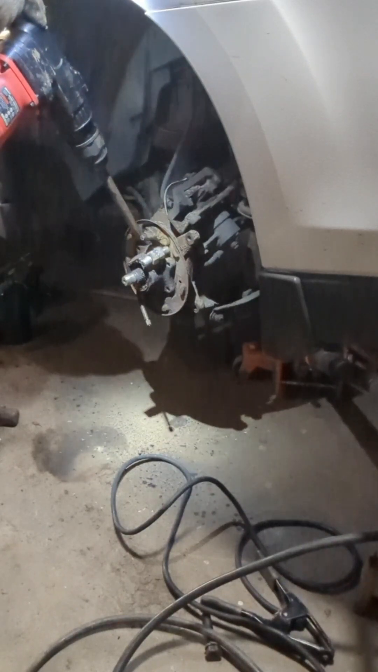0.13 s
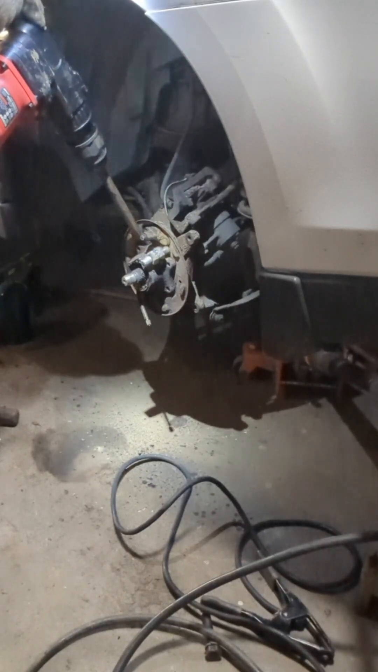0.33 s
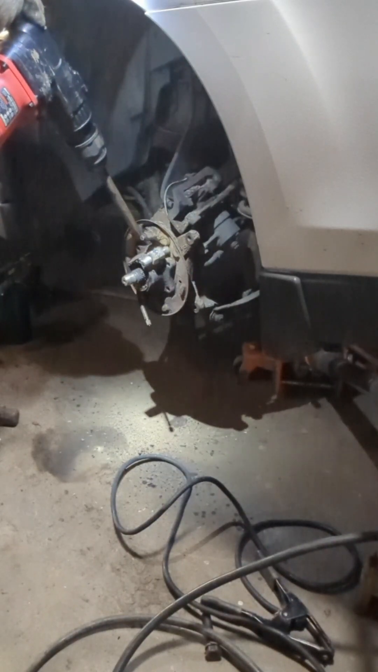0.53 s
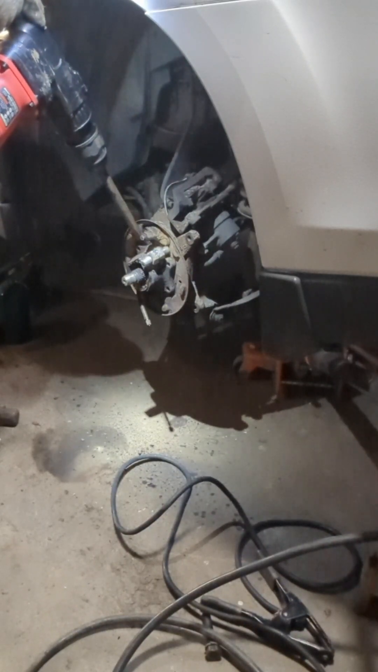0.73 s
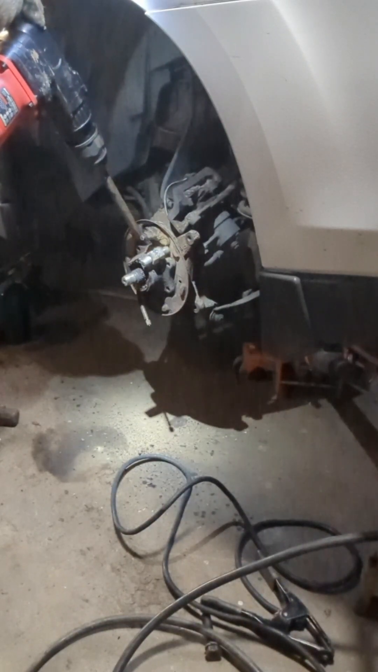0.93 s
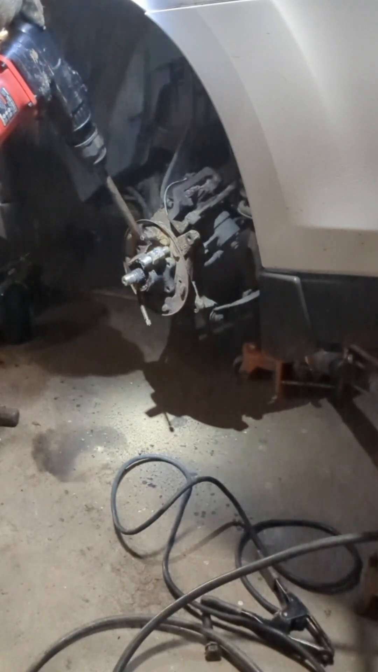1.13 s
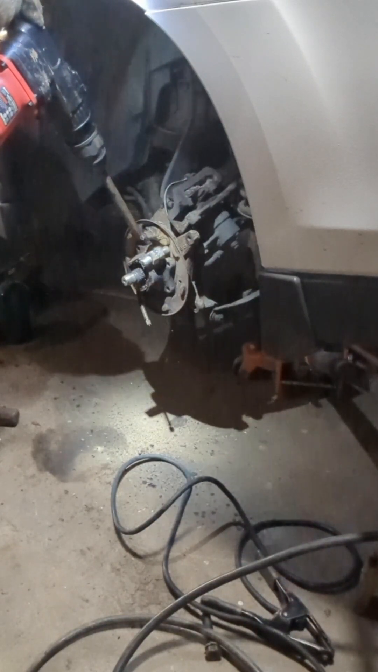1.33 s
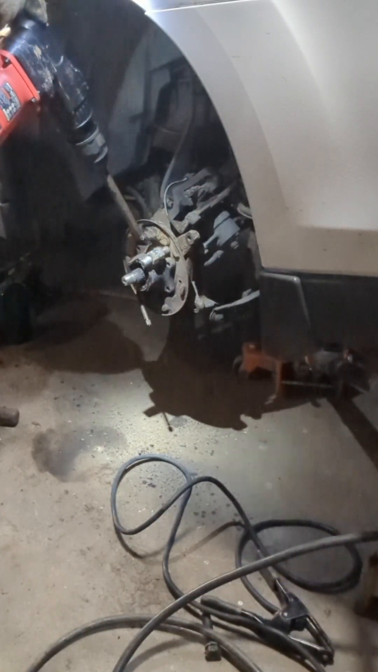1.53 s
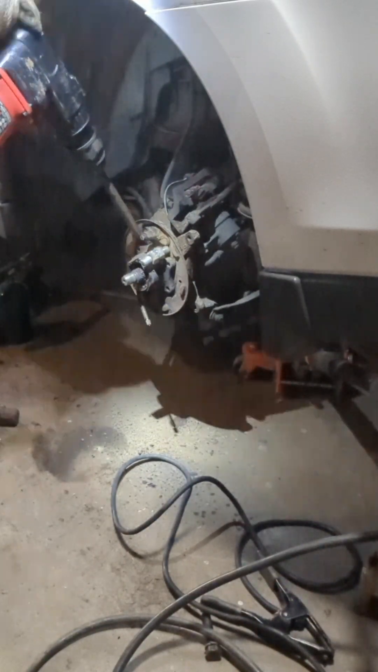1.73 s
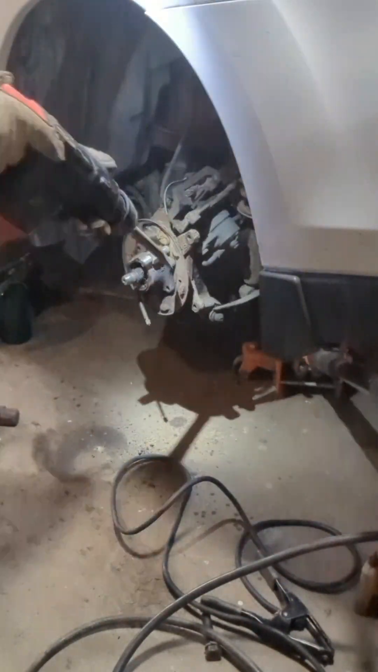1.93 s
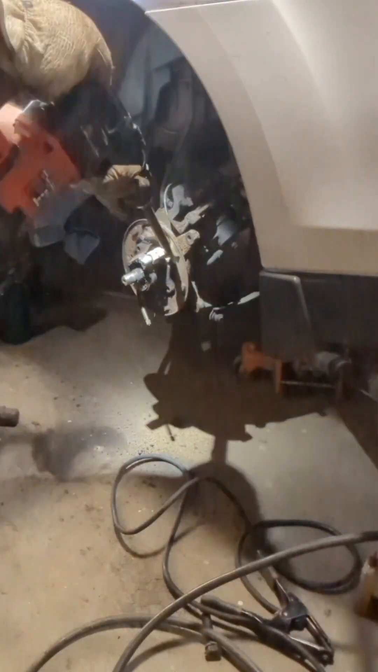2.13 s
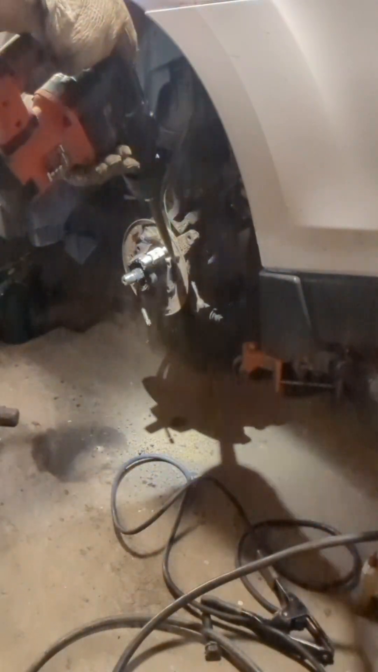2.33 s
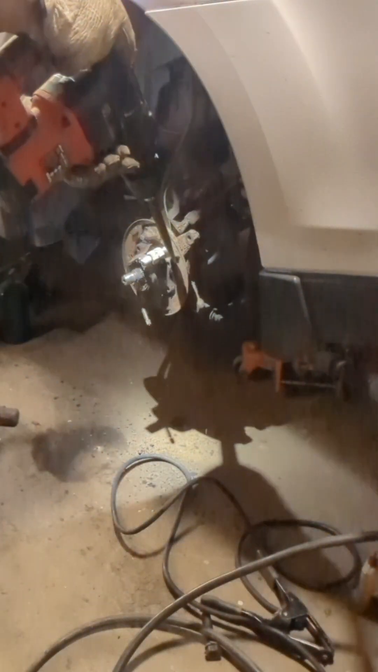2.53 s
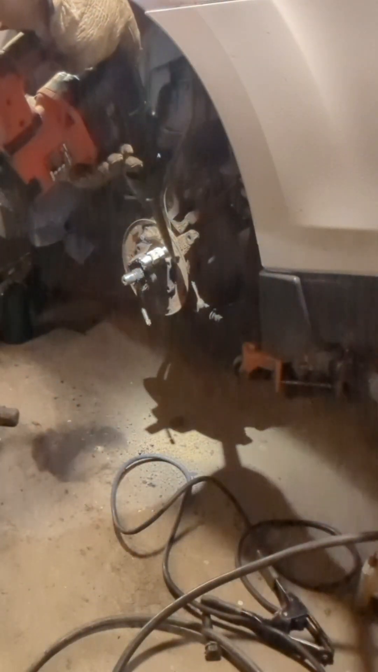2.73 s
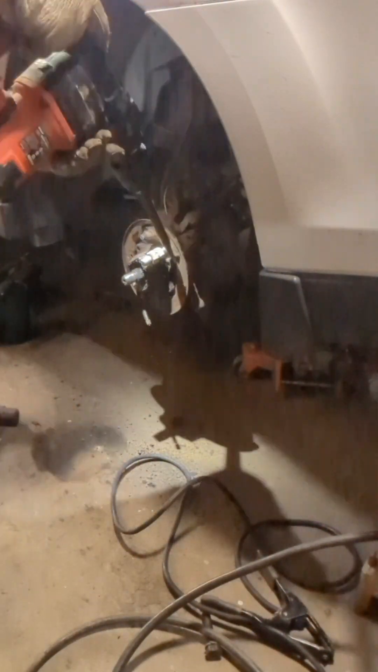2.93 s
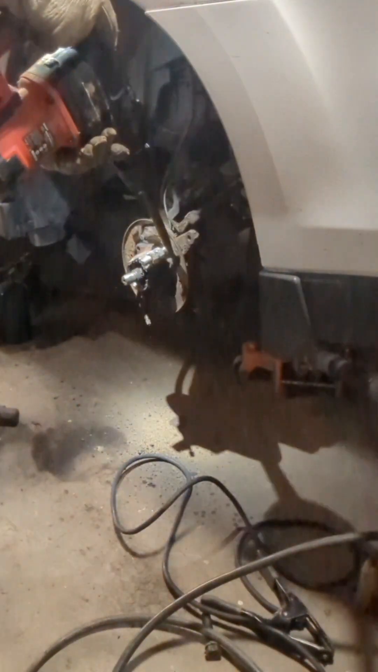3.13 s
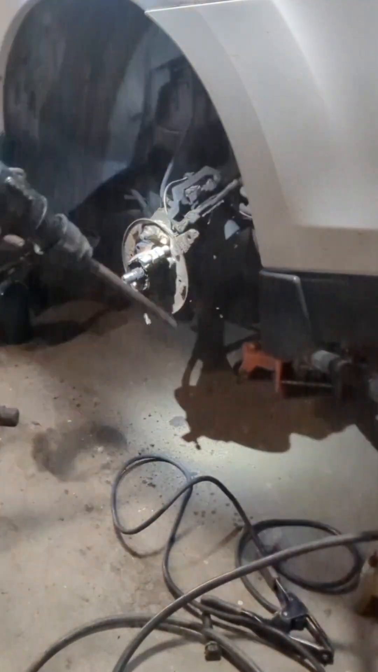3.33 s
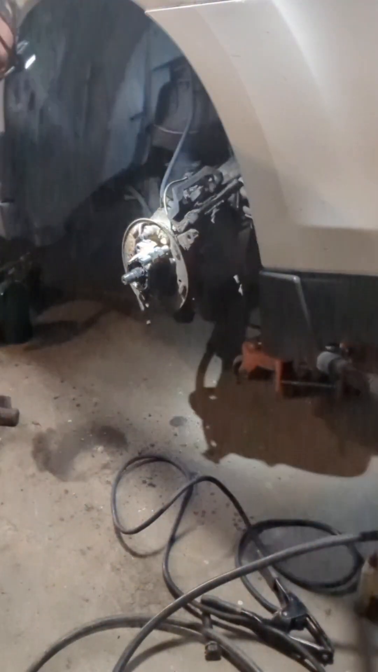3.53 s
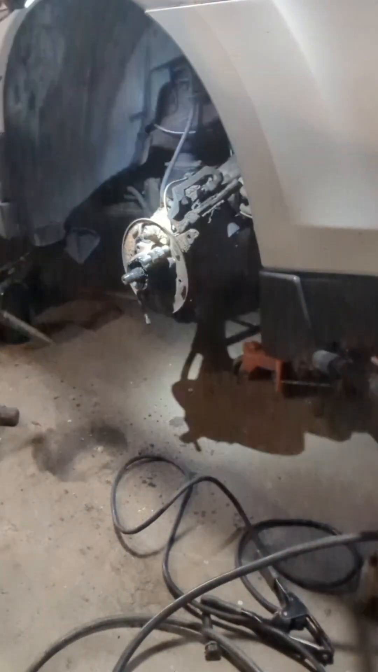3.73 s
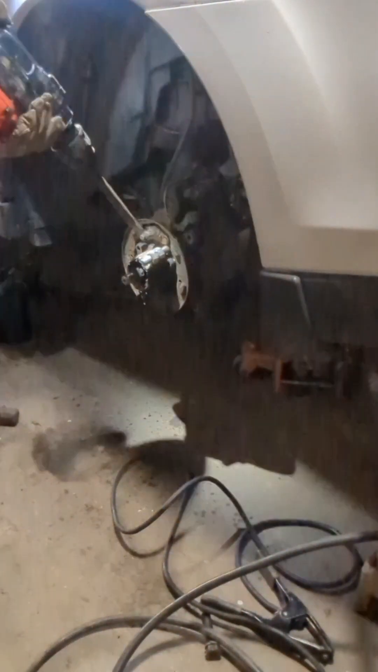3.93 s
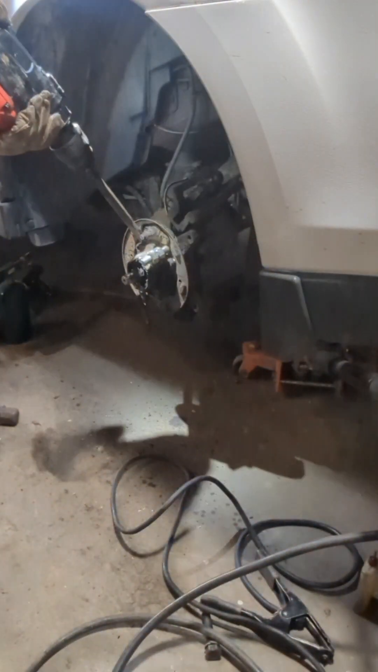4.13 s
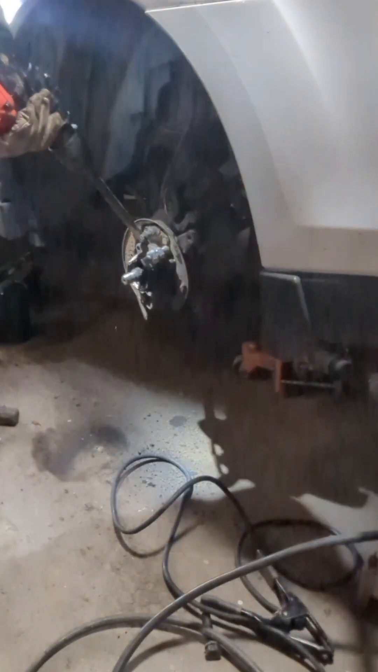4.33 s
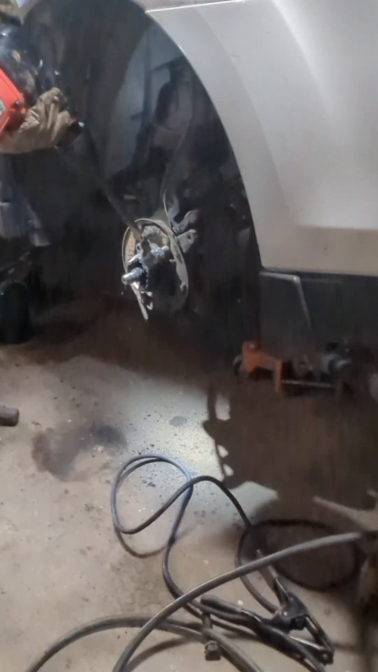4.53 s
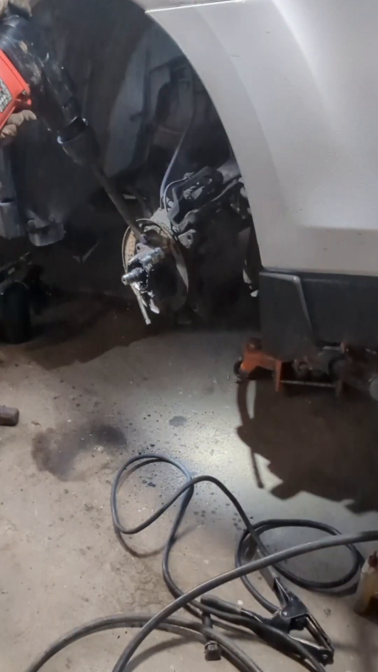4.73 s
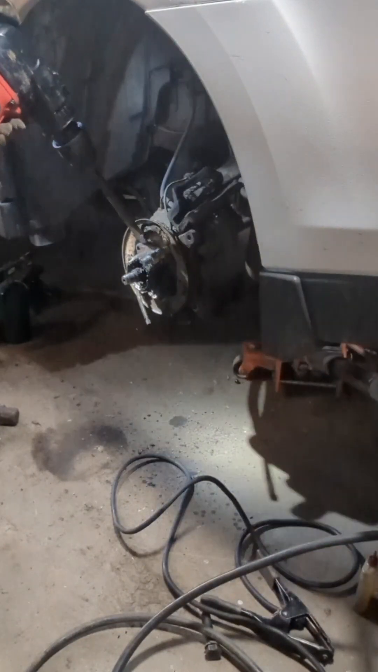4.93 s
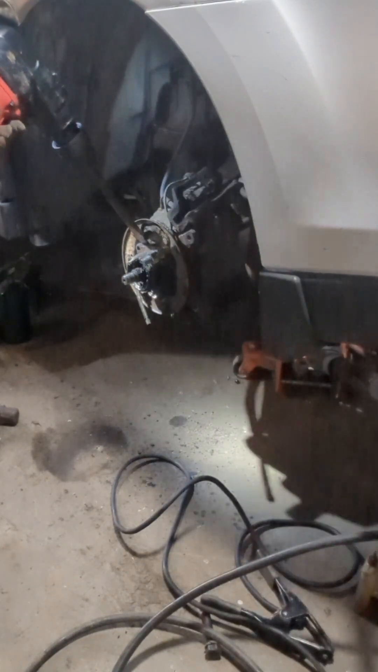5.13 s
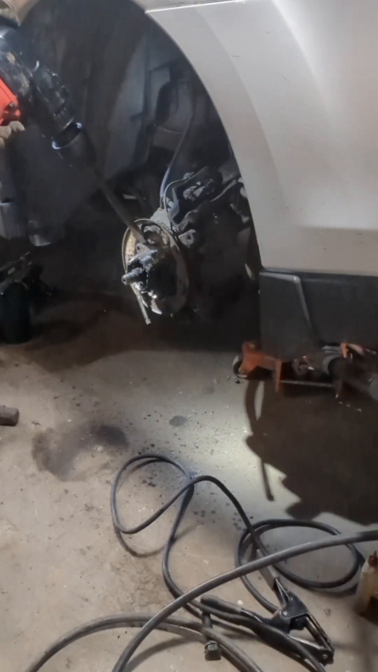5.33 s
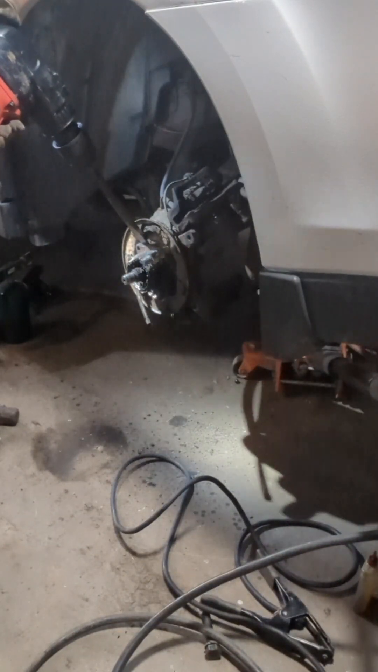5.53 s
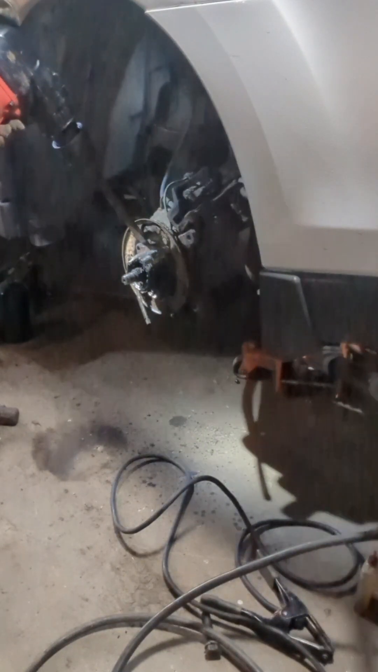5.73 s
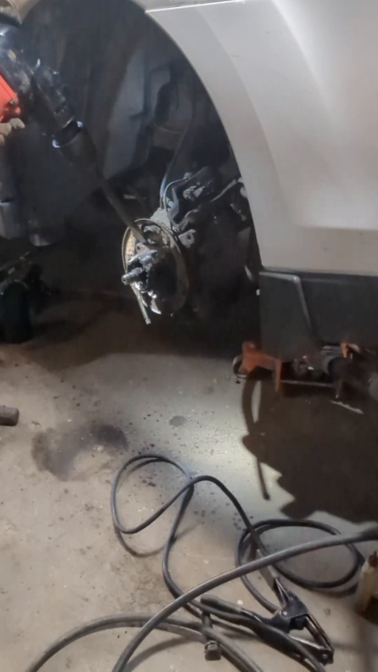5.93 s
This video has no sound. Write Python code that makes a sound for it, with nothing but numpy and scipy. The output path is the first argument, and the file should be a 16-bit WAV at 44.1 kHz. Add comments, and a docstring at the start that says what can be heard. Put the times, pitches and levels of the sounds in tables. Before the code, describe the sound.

From the very start an electric rotary hammer pounds a chisel into a car wheel hub, close by in a garage. It is a loud, steady, buzzing rattle of about fifty blows a second, with ringing steel, clattering loose parts and a few low thumps on the right of the microphone. At 1.4 seconds the hammering ends with small knocks, and the motor whines freely, much quieter, until 1.8. Faint scrapes follow. At 2.1 seconds the motor restarts with metallic clicks and runs without load, a high whine over airy hiss, until 3.3. In the pause come soft glove scrapes and tiny squeaks, then a sharp click and knock near 3.9 as the motor starts again. This last run settles into a steady whir with light ticks of the loose chisel, shifts slightly in tone around 4.8, and continues to the end at about 6 seconds.

```python
"""A rotary hammer drives a chisel into a seized wheel hub in a garage, about 51 blows a second.
Hub, brake shield and chisel ring, the suspension clatters, and hard blows jolt the right microphone.
Then the pressure comes off: fan, commutator and gears whine unloaded over the hiss of the brushes.
The motor stops and is started twice more, with scrapes, clicks and knocks as the tool is shifted."""
import sys
import numpy as np
from scipy import signal
from scipy.fft import rfft, irfft, next_fast_len
from scipy.io import wavfile

SR = 44100
rng = np.random.default_rng(int(sys.argv[2]) if len(sys.argv) > 2 else 0)


def store_pcm(level_fs):
    """Save levels as 16-bit WAV."""
    pcm = np.round(np.clip(level_fs, -1, 1) * 32767).astype(np.int16)
    wavfile.write(sys.argv[1], SR, np.atleast_2d(pcm).T)


N = 263698
TIME = np.arange(N) / SR
FIRST_BLOW_S, RELEASE_S, BLOW_HZ = .015, 1.385, 50.817


def undb(db):
    """Decibels to gain."""
    return 10 ** (np.asarray(db) / 20)


def unit(x):
    """Scale each channel to rms 1."""
    return x / np.sqrt(np.mean(x ** 2, axis=-1, keepdims=True) + 1e-20)


def noise():
    """Wide stereo white noise."""
    return rng.standard_normal((2, N))


def gate(start_s, end_s, fade_s):
    """Open between start and end, with soft edges."""
    return np.clip((TIME - start_s) / fade_s + .5, 0, 1) * np.clip((end_s - TIME) / fade_s + .5, 0, 1)


def wander(rate_hz):
    """Smooth random modulation of spread near 1, one for each channel."""
    knots = rng.standard_normal((2, 8192))
    return np.array([np.interp(TIME * rate_hz, np.arange(8192), row) for row in knots])


def filtered(x, response):
    """Apply a gain given as a function of frequency."""
    size = next_fast_len(N + SR // 4)
    hz = np.arange(size // 2 + 1) * SR / size + 1e-3
    return irfft(rfft(x, size) * response(hz), size)[..., :N]


def colour(x, eq):
    """Shape by an EQ curve of (freq_hz, gain_db) points; rms 1."""
    hz, db = np.transpose(eq)
    return unit(filtered(x, lambda f: undb(np.interp(np.log(f), np.log(hz), db))))


def ring(x, hz, width_hz):
    """One damped resonance; rms 1."""
    return unit(signal.lfilter(*signal.iirpeak(hz, hz / width_hz, fs=SR), x))


def tail(start_s, t60_s):
    """Full level until the start, then a decay."""
    return undb(-60 * np.clip((TIME - start_s) / t60_s, 0, 2))


def blows(delay_s, jitter_s, scatter_db):
    """One hit per cycle of the striker, each a little early or late and of its own strength."""
    times = np.arange(FIRST_BLOW_S, RELEASE_S, 1 / BLOW_HZ)
    chance = rng.standard_normal((len(times), 2))
    at = (times + delay_s + jitter_s * chance[:, 0]) * SR
    taps = at.astype(int)[:, None] + np.arange(-7, 9)  # hits land between samples
    train = np.zeros(N)
    train[taps] = np.sinc(taps - at[:, None]) * undb(scatter_db * chance[:, 1:])
    return train


# Dense, bright EQ of the suspension: freq_hz, gain_db
SUSPENSION_EQ = [(30, -7), (60, -15), (160, -11), (280, -9), (600, -1.5), (1100, 1.5), (2000, 2.5),
                 (2600, 2.5), (3000, -1.5), (4200, 0), (8000, -2), (9800, 4), (10900, -7.5), (13800, -3),
                 (16000, -13.5)]

def suspension_clatter(hits, t60_s=.47):
    """The same dense ringing answers every blow, so it buzzes at the blow rate."""
    count = SR // 4
    ringing = noise()[:, :count] * undb(-60 * TIME[:count] / t60_s)
    return colour(signal.fftconvolve(hits[None], ringing, axes=1)[:, :N], SUSPENSION_EQ)


def loose_rattle(decay_s=.22):
    """Loose parts rattle on from each blow to the next."""
    since_blow = (TIME - FIRST_BLOW_S) % (1 / BLOW_HZ)
    rattle = colour(noise(), SUSPENSION_EQ)
    return rattle * unit(np.exp(-since_blow / decay_s) * undb(2 * wander(500) + 2.1 * wander(25.1)))


# Ringing modes of hub and brake shield: pitch_hz, level_db
HUB_MODES = [(560, -54), (610, -54), (764, -56), (915, -56), (1017, -47), (1066, -43), (1119, -49),
             (1220, -46), (1270, -56), (1422, -52), (1524, -51), (1576, -56), (1728, -55), (1931, -52),
             (2083, -51), (2134, -56), (2388, -55), (2590, -53), (2690, -54)]

def hub_ring(hits, width_hz=20):
    """The blows ring the hub; each mode reaches the right microphone a quarter cycle late."""
    out = np.zeros((2, N))
    for hz, db in HUB_MODES:
        mode = ring(hits, hz, width_hz)
        late = np.pad(mode, (int(SR / hz / 4), 0))[:N]
        out += undb(db) * np.array([mode, late])
    return out


# Landings of the chisel within one cycle: delay_s, level_db
CHISEL_BOUNCES = [(0, 4.5), (.0046, -2.5), (.0074, -3), (0.0095, -4), (0.015, -7)]
# High ring of the chisel steel: pitch_hz, width_hz, level_db
CHISEL_MODES = [(7550, 150, -4), (8672, 38, -1), (8880, 35, -3), (9090, 80, 0), (9315, 32, -1),
                (9520, 40, -1), (9625, 40, 0), (9860, 80, 1), (10010, 35, -1), (10190, 55, 0),
                (10700, 70, -8)]

def chisel_chatter(burst_s=.0027):
    """Each landing is a gritty burst that cracks and rings the steel; later bounces are looser in time."""
    landings = sum(undb(db) * blows(s, jitter_s=5e-5 + .013 * s, scatter_db=-1.5)
                   for s, db in CHISEL_BOUNCES)
    grit = noise() * signal.lfilter([1], [1, -np.exp(-1 / (burst_s * SR))], landings)
    steel = sum(undb(db) * ring(grit, hz, width) for hz, width, db in CHISEL_MODES)
    crack = colour(grit, [(300, -12), (1500, 1), (7500, 12.5), (8800, -28), (10200, -17),
                          (11000, -5), (16000, 8.5)])
    return undb(-16) * steel + undb(-13) * crack


def pan(db):
    """Stereo gains, with the left louder by db."""
    return undb(np.array([[db], [-db]]) / 2)


def hammering(gain_db=-24):
    """Under steady pressure the blows drive suspension, hub and chisel until the release."""
    hits = blows(0, jitter_s=4.5e-5, scatter_db=1.5)
    duty = np.sqrt(RELEASE_S * SR / N)  # refers the rms to the time spent hammering
    clatter = undb(-7.5) * suspension_clatter(hits)
    rattle = undb(-7) * loose_rattle()
    hub = undb(24.5) * pan(2) * hub_ring(hits)
    chisel = pan(-3) * chisel_chatter()
    mix = duty * (clatter + hub + chisel) + rattle
    return undb(gain_db) * mix * gate(-1, RELEASE_S + .0087, .0099)


# Low thump of the tool's recoil: blow_rate_multiple, level_db
BODY_HARMONICS = [(1, -59), (2, -57), (3, -54), (4, -61)]

def body_shudder(gain_db=1):
    """The tool recoils at the blow rate, thumping at that rate and its first multiples."""
    hum = sum(undb(db) * np.sin(2 * np.pi * (k * BLOW_HZ * TIME + rng.random((2, 1))))
              for k, db in BODY_HARMONICS)
    return hum * undb(gain_db + 3.4 * wander(13.7)) * gate(-1, RELEASE_S, .026)


# Room tone EQ: freq_hz, gain_db
GARAGE_EQ = [(30, -9.5), (220, -20), (300, -16), (400, 4), (550, 5.5), (800, 0), (1300, 3), (2000, -3),
             (5000, -5), (9000, -11.5), (16000, -6.5)]

def garage_air(level_db=-62.5):
    """A faint, steady bed of garage noise."""
    return colour(noise(), GARAGE_EQ) * undb(level_db + .23 * wander(1.7))


# Thumps from the hardest blows: time_s, level_db
MIC_JOLTS = [(0.0563, -19), (0.0761, -16.5), (0.0957, -13), (0.1153, -11.5), (0.232, -21.5),
             (0.2917, -16.5), (0.507, -30), (0.604, -26), (0.6248, -36), (0.684, -24), (0.7446, -26.0),
             (0.921, -13.5), (1.3358, -23)]

def microphone_jolts(push_s=.00079, leak_hz=60, rebound_hz=36, gain_db=5):
    """A push on the right microphone leaks away and swings back; every blow also gives a faint one."""
    bump = lambda t: np.exp(-np.minimum((t / push_s) ** 2, 50))
    hits = blows(0, jitter_s=.00012, scatter_db=2.5)
    tremor = signal.fftconvolve(hits, bump(TIME[:SR // 100] - TIME[SR // 200]), "same")
    push = sum(undb(db) * bump(TIME - s) for s, db in MIC_JOLTS) + undb(-35) * tremor
    leaked = signal.lfilter(*signal.butter(1, leak_hz, "high", fs=SR), -push)
    swing = signal.sosfilt(signal.butter(3, rebound_hz, "high", fs=SR, output="sos"), leaked)
    return undb(gain_db) * swing * undb([[-27], [0]])


# Band offsets at switch-on, one row each: mid_db, bass_db, top_db
SWITCH_ON_DB = [
    [2],
    [-3],
    [6],
]

def motor_drive(run, free_speed, spinup_s=.0295, coast_hz_per_s=560, coast_db_per_s=43):
    """Shaft speed, band levels and gate of one run: it starts loud, settles and coasts down."""
    on_s, off_s, stop_s, start_hz, settle_s = run[:5]
    settled_db, surge_db = np.reshape(run[5:], (2, 3, 1))
    running_s = np.maximum(TIME - on_s, 0)
    coasting_s = np.maximum(np.minimum(TIME, stop_s) - off_s, 0)
    starting = np.exp(-running_s / spinup_s)
    free_hz = np.interp(TIME, *np.transpose(free_speed))
    shaft_hz = free_hz * (1 - starting) + start_hz * starting - coast_hz_per_s * coasting_s
    bands_db = settled_db + surge_db * np.exp(-running_s / settle_s) + SWITCH_ON_DB * starting
    return shaft_hz, bands_db - coast_db_per_s * coasting_s, gate(on_s, stop_s, .019)


def shaft_whine(turns, on, harmonics, wander_db=2, rasp=.17):
    """Fan, commutator and gears sing at multiples of the shaft speed."""
    whine = np.zeros((2, N))
    for k, db in harmonics:
        # small moves of the tool shift the reflections, so each harmonic wanders on its own
        gain = undb(db + wander_db * wander(6))
        phase = rng.random() + np.array([[0], [(-1) ** int(k) / 4]])  # sides a quarter cycle apart
        whine[:, on] += gain[:, on] * np.sin(2 * np.pi * (k * turns[on] + phase))
    tooth_roughness = 1 + rasp * wander(150)
    return whine * tooth_roughness / np.std(whine[:, on])


# Airy EQ of the brush hiss: freq_hz, gain_db
BRUSH_EQ = [(40, -35), (220, -24), (450, -12.5), (1200, -13.5), (2700, -6.5), (4000, -5), (4900, -2.5),
            (7000, 3), (8000, -4), (9500, 0), (11000, -1.5), (13500, 3.5), (16000, 1.5)]

def brush_hiss(turns):
    """Brushes and air hiss, pulsing once a turn and roughened by sparking."""
    pulse = 1 + .5 * np.cos(2 * np.pi * turns)
    return colour(noise(), BRUSH_EQ) * unit(pulse * undb(.9 * wander(400)))


def motor(run, free_speed, harmonics, hiss_db, slow_hiss_boost_db):
    """One unloaded run of whine over hiss; below full speed the hiss takes over."""
    shaft_hz, (mid_db, bass_db, top_db), envelope = motor_drive(run, free_speed)
    on = envelope > 0
    flutter = 1 + .0003 * wander(120)[0]
    turns = np.cumsum(shaft_hz * flutter) / SR
    slowness = np.clip((1 - shaft_hz / np.max(shaft_hz) - .012) / .055, 0, 1)
    hiss_gain = undb(hiss_db + slow_hiss_boost_db * slowness)
    sound = shaft_whine(turns, on, harmonics) + hiss_gain * brush_hiss(turns)
    sound *= envelope / np.sqrt(1 + hiss_gain ** 2)
    # the housing beams bass, mids and top differently as it turns
    bass = filtered(sound, lambda f: 1 / (1 + (f / 4000) ** 12))
    top = filtered(sound, lambda f: 1 - 1 / (1 + (f / 11000) ** 24))
    bands = [(bass, bass_db, -3.5), (sound - bass - top, mid_db, .3), (top, top_db, .62)]
    return sum(band / np.std(band[:, on]) * undb(db) * pan(pan_db) for band, db, pan_db in bands)


# Motor cues: on_s, off_s, stop_s, start_hz, settle_s, settled_mid_db, settled_bass_db, settled_top_db,
# surge_mid_db, surge_bass_db, surge_top_db
MOTOR_RUNS = [(1.391, 1.742, 1.817, 436, 0.081, -40.5, -52.5, -40.5, 1.5, 7.5, 0.5),
              (2.118, 3.284, 3.32, 200, .36, -42, -50, -43, 9.5, 8.5, 7),
              (3.955, 6.1, 6.2, 197.6, .5, -43.5, -54, -38, 9.5, 13, -4.5)]
# Drift of the free shaft speed, one curve per run: time_s, speed_hz
SHAFT_SPEEDS = [
    [(1.46, 441.5), (1.71, 437)],
    [(2.29, 438), (2.36, 437), (2.732, 433.5), (3.246, 436), (3.26, 435)],
    [(4.12, 434.2), (4.4, 432.3), (4.74, 433), (4.802, 430.8), (4.888, 432), (4.966, 431), (5.95, 432)],
]
# Timbre of the whine for each grip on the tool: shaft_multiple, level_db
FIRST_GRIP = [(1, -14.5), (2, -22), (3, -22.5), (4, -15.5), (5, -11), (6, -22), (7, -18), (8, -15),
              (9, -41), (10, -11.5), (11, -8.5), (12, -11), (13, -16), (14, -13), (15, -10.5), (16, -18),
              (17, -32), (18, -6.5), (19, -9), (20, -3), (21, -1), (22, -1), (23, -1.5), (24, -18),
              (25, -17), (26, -7), (27, -20), (28, -1.5), (29, -21), (30, -23), (31, -14), (32, -2),
              (33, -7), (34, -7), (35, -19)]
SECOND_GRIP = [(1, -11), (2, -20.5), (3, -6), (4, -10.5), (5, -5), (6, -20), (7, -1.5), (8, -5), (9, -8),
               (10, -7), (11, -2.5), (12, -7), (13, -3), (14, 0), (15, -9), (16, 0), (17, -7), (18, -13),
               (19, -13), (20, -5), (21, 0), (22, -4), (23, 1), (24, -10), (25, -7), (26, 4), (27, -13),
               (28, 0), (29, 3), (30, 2), (31, -5), (32, -11), (33, 2.5), (34, -1), (35, -4)]
THIRD_GRIP = [(1, -13), (2, -19), (3, -16), (4, -14), (5, -7.5), (6, -13), (7, -10), (8, -13), (9, -28),
              (10, -8.5), (11, -8), (12, -7), (13, -13), (14, -9.5), (15, -10), (16, -3.5), (17, -12),
              (18, -21), (19, -13), (20, -8.5), (21, -9), (22, -5), (23, -16), (24, -7), (25, -4.5),
              (26, -3.5), (27, -6), (28, 1.5), (29, 4), (30, -10), (31, 5.5), (32, -11), (33, 5), (34, -9),
              (35, 6.5), (36, 4)]
FRONT_HAND_OFF = [(1, -18), (2, -21), (3, -15), (4, -13), (5, -8), (6, -15), (7, -18), (8, -21), (9, -21),
                  (10, -8), (11, -2), (12, -9), (13, -17), (14, -3), (15, -19), (16, -4), (17, -6),
                  (18, -17), (19, -6), (20, -16), (21, -18), (22, -13), (23, -12), (24, -17), (25, -12),
                  (26, 0), (27, -11), (28, -7), (29, -7), (30, -12), (31, 0), (32, -4), (33, 1), (34, -14),
                  (35, -3), (36, -9)]

def unloaded_runs(let_go_s=4.76):
    """Three runs; in the last, the hand leaves the front of the housing and the timbre shifts."""
    hand_off = gate(let_go_s, 9, .085)
    shifting_grip = [(k, held_db + (open_db - held_db) * hand_off)
                     for (k, held_db), (_, open_db) in zip(THIRD_GRIP, FRONT_HAND_OFF)]
    return (motor(MOTOR_RUNS[0], SHAFT_SPEEDS[0], FIRST_GRIP, hiss_db=-4, slow_hiss_boost_db=33)
            + motor(MOTOR_RUNS[1], SHAFT_SPEEDS[1], SECOND_GRIP, hiss_db=-3, slow_hiss_boost_db=17.5)
            + motor(MOTOR_RUNS[2], SHAFT_SPEEDS[2], shifting_grip, hiss_db=-5, slow_hiss_boost_db=31))


def chuck_rattle(taps_per_s=9, tap_db=-54, scatter_db=6, t60_s=.023):
    """While the motor runs free, the chisel taps lightly in its chuck at random moments."""
    count = int(taps_per_s * N / SR)
    at = (rng.random(count) * N).astype(int)
    taps = np.zeros(N)
    taps[at] = undb(tap_db + scatter_db * rng.standard_normal(count))
    running = sum(gate(on_s, stop_s, .02) for on_s, _, stop_s, *_ in MOTOR_RUNS)
    envelope = signal.lfilter([1], [1, -undb(-60 / (t60_s * SR))], taps * running)
    eq = [(100, -35), (250, -9), (500, -8), (1500, 8.5), (3000, 19), (6000, -8), (16000, -7)]
    return colour(noise(), eq) * envelope


# Dull knocks: start_s, level_db
KNOCK_CUES = [(1.393, -32), (1.405, -32), (1.445, -36.5), (1.463, -38), (1.743, -41), (3.304, -42),
              (3.927, -29.5), (5.553, -46)]

def chuck_knocks(t60_s=.039):
    """The loose chisel knocks in its chuck."""
    eq = [(100, -42), (250, -5), (450, 11), (1500, 6.5), (3000, -4.5), (6000, -27), (16000, -29)]
    return colour(noise(), eq) * sum(undb(db) * (TIME >= s) * tail(s, t60_s) for s, db in KNOCK_CUES)


# High gear whistles: start_s, end_s, level_db
GEAR_CUES = [(1.394, 1.818, -44), (3.959, 4.022, -29.5)]

def gear_song(hz=9250, width_hz=660):
    """The teeth rub a resonance of the gear case as the drive takes up or loses load."""
    whistle = ring(ring(noise(), hz, width_hz), hz, width_hz)
    return whistle * sum(undb(db) * gate(start, end, .0079) for start, end, db in GEAR_CUES)


# Bright clicks: start_s, level_db, t60_s
CLICK_CUES = [(1.395, -35, .02), (1.405, -35, .02), (1.443, -40, 0.018), (2.064, -48, 0.044),
              (2.121, -29, 0.097), (2.158, -24, 0.13), (2.551, -26, .02), (3.536, -52, 0.27),
              (3.727, -44, 0.078), (3.9213, -19, 0.023), (3.968, -18, 0.012), (3.976, -23.5, 0.11),
              (3.989, -30, 0.017), (4.005, -23, 0.04)]

def metal_clicks():
    """The loose chisel and the gears click, metal on metal."""
    eq = [(100, -50), (250, -33), (600, -15), (2000, 2), (6500, 4), (9500, 1), (12000, 9.5),
          (16000, -11)]
    return colour(noise(), eq) * sum(undb(db) * (TIME >= s) * tail(s, t60) for s, db, t60 in CLICK_CUES)


# Dry, bright EQ of a scrape: freq_hz, gain_db
SCRAPE_EQ = [(880, -52), (1500, -16), (2120, -29), (2880, -11.5), (3310, -4.5), (4000, -2), (6060, -2),
             (6560, 1.5), (8920, -6), (16000, -1)]
# Scrape strokes: start_s, length_s, level_db
SCRAPE_CUES = [(1.815, 0.069, -50), (1.875, 0.033, -46), (1.974, .014, -54.5), (2.005, .015, -62),
               (2.02, 0.015, -52), (2.048, 0.025, -54), (3.314, 0.17, -47.5), (3.528, 0.042, -45.5),
               (3.572, 0.08, -59.5), (3.709, 0.017, -52), (3.757, 0.13, -62.5), (3.859, 0.077, -50)]

def glove_scrapes(attack_s=.011, t60_s=.077, grain_db=5):
    """Glove and tool scrape: each grainy stroke swells, holds through the slide and dies away."""
    strokes = sum(undb(db) * np.clip((TIME - s) / attack_s, 0, 1) * tail(s + length, t60_s)
                  for s, length, db in SCRAPE_CUES)
    return colour(noise(), SCRAPE_EQ) * unit(undb(grain_db * wander(64))) * strokes


def thin_tone(hz=1412):
    """A faint, wavering tone in the two gaps between the runs."""
    tone = np.sin(2 * np.pi * (hz * TIME + np.array([[0], [1 / 8]])))
    envelope = undb(-64.5) * gate(1.864, 2.13, .047) + undb(-60) * gate(3.4, 3.97, .047)
    return tone * envelope * undb(wander(8))


# Tiny squeaks: centre_s, pitch_hz, level_db, half_length_s
SQUEAK_CUES = [(3.364, 3000, -50, 0.018), (3.897, 2604, -45, 0.013), (3.924, 2030, -35, 0.002),
               (3.928, 622, -50, 0.0098), (3.929, 1265, -47.5, 0.019), (3.932, 2800, -32.5, 0.0038)]

def tip_squeaks():
    """The chisel tip slips at a nearly steady pitch as it is moved."""
    out = np.zeros((2, N))
    for centre_s, hz, db, half_length_s in SQUEAK_CUES:
        cycles = np.cumsum(hz * (1 + .04 * wander(700)), axis=1) / SR
        out += undb(db) * np.sin(2 * np.pi * cycles) / (1 + ((TIME - centre_s) / half_length_s) ** 4)
    return out


def handling(low_cut_hz=260):
    """Contact sounds of the shifting tool, with the bass cut away."""
    contacts = (undb(-5) * chuck_knocks() + undb(-8) * metal_clicks()
                + undb(1) * glove_scrapes() + tip_squeaks())
    return signal.sosfilt(signal.butter(3, low_cut_hz, "high", fs=SR, output="sos"), contacts)


def scene():
    """Hammering, then three unloaded runs with handling between them."""
    return (hammering() + body_shudder() + garage_air() + microphone_jolts()
            + unloaded_runs() + chuck_rattle() + gear_song() + handling() + thin_tone())


def record(dry):
    """A steep high cut at 15780 Hz."""
    return signal.sosfilt(signal.ellip(12, .2, 80, 15780, fs=SR, output="sos"), dry)


dry = scene()
out = record(dry)
store_pcm(out)
```